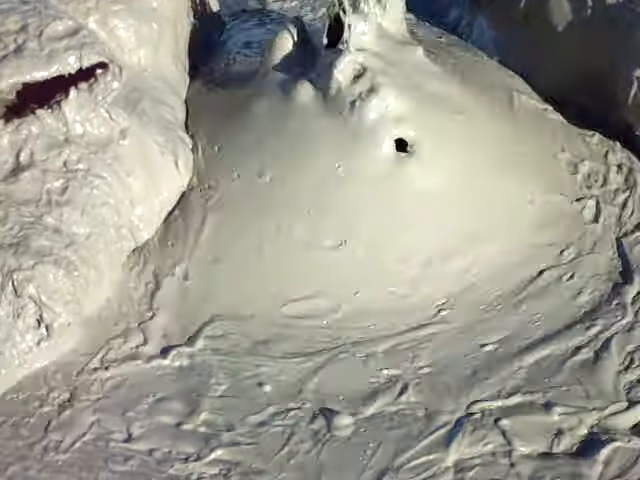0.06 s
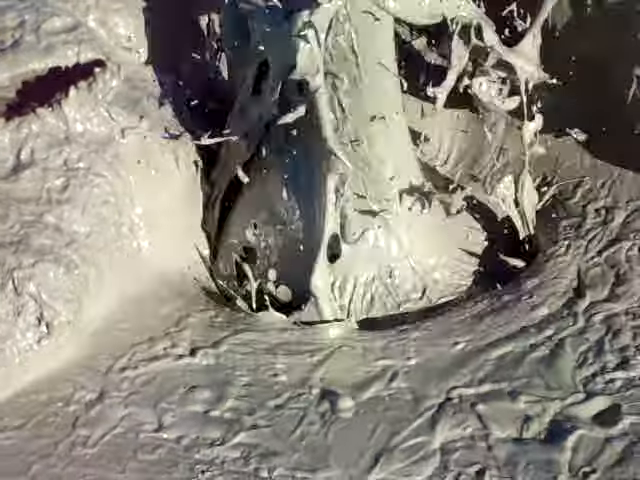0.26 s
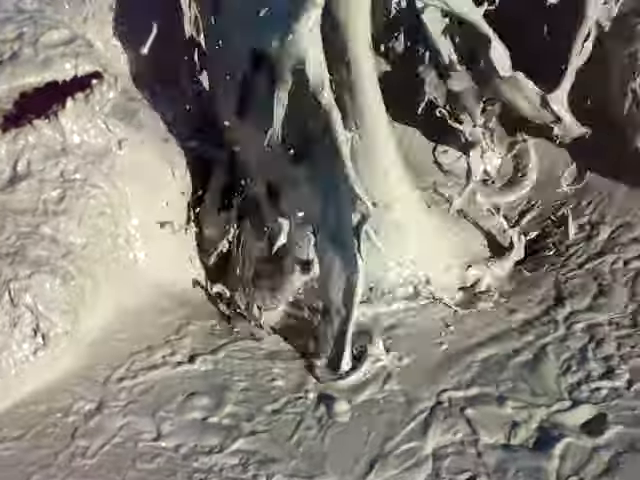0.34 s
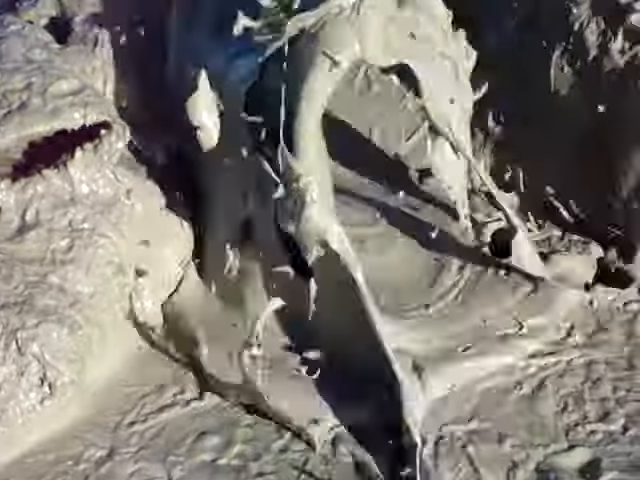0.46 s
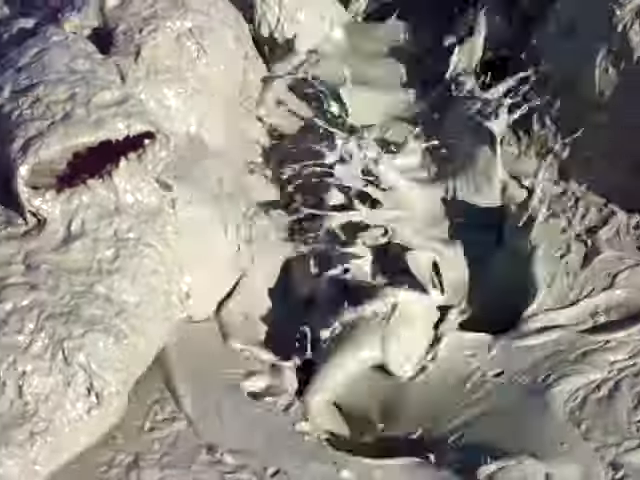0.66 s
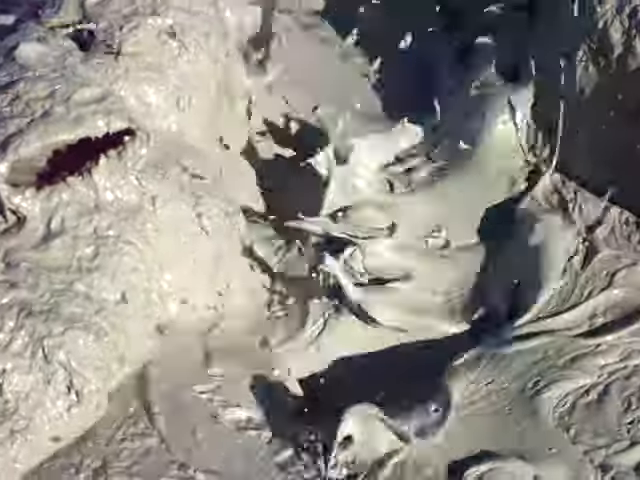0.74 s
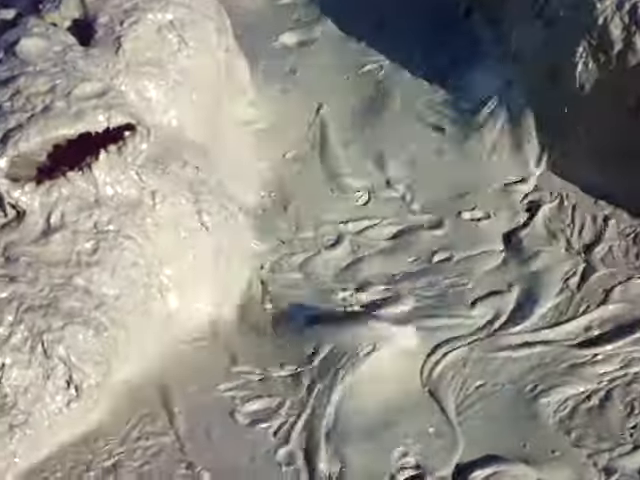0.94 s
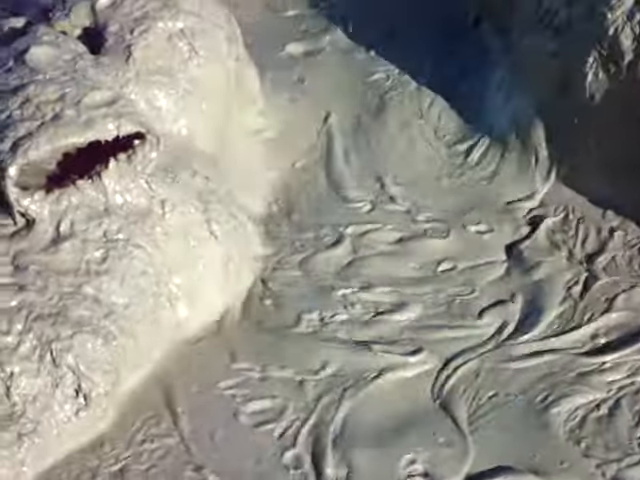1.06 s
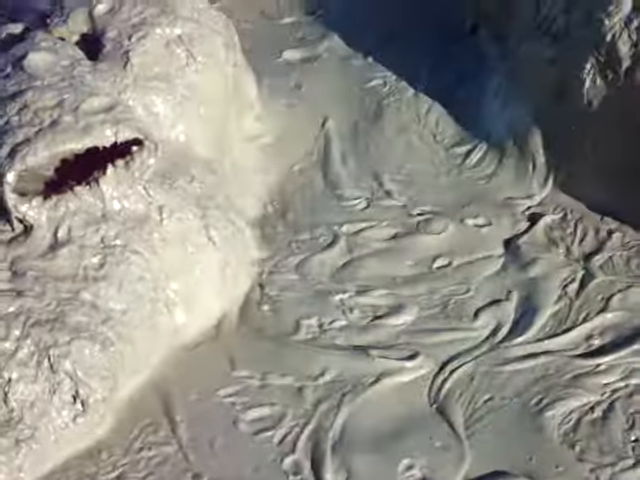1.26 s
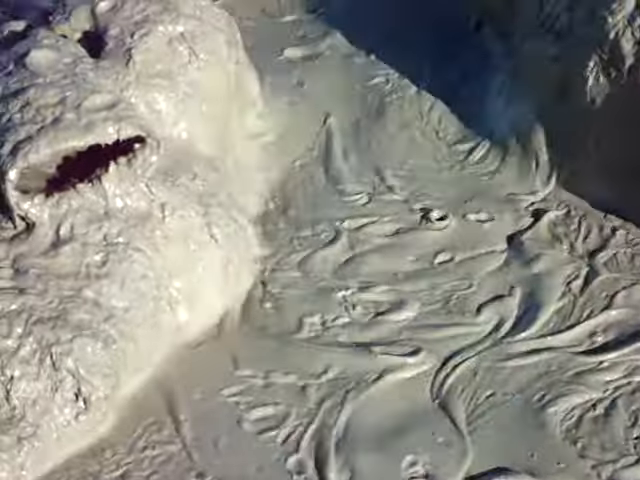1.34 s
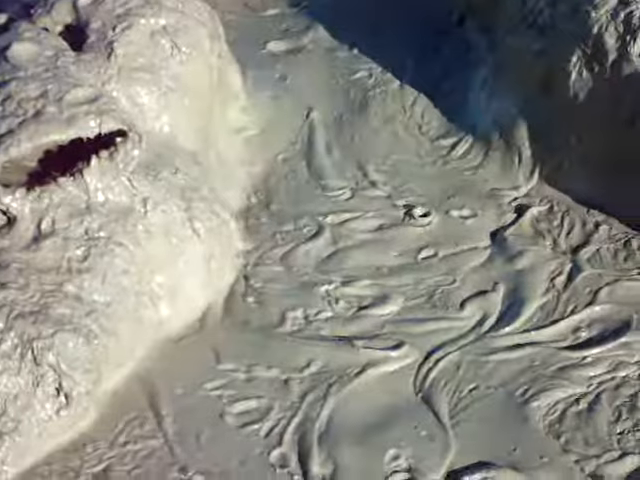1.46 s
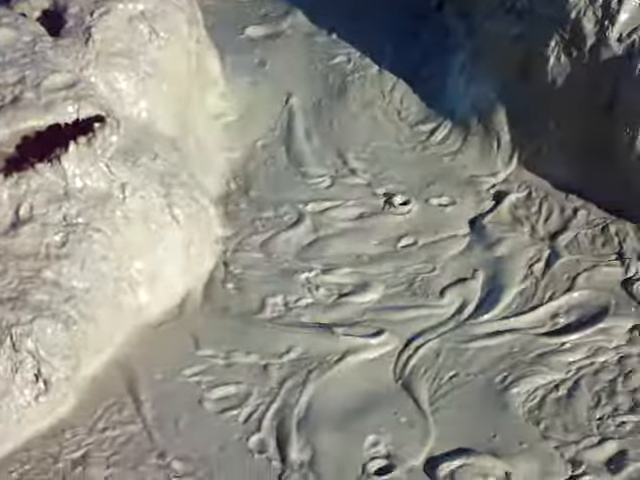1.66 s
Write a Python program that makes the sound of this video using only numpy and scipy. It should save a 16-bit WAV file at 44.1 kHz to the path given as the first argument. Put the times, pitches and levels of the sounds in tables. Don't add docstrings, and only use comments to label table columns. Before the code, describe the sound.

Thick mud bubble pops open with a hollow gulp, then blobs splatter and slap back down

```python
import sys
import numpy as np
from scipy import signal
from scipy.fft import rfft, irfft
from scipy.io import wavfile
from scipy.ndimage import uniform_filter1d, minimum_filter1d

SR = 44100
rng = np.random.default_rng(int(sys.argv[2]) if len(sys.argv) > 2 else 0)


def gain_from_db(level_db):
    decades = np.asarray(level_db, float) / 20
    return 10 ** decades


def master_out(mix):
    frames = np.transpose(np.atleast_2d(mix))
    ceiling = np.clip(frames, -1, 1)
    pcm = np.round(ceiling * 32767).astype(np.int16)
    wavfile.write(sys.argv[1], SR, pcm)


N = 74970


def evened(x):
    return x / np.sqrt(np.mean(x ** 2) + 1e-20)


def along(points, column=1):
    rows = np.array(points)
    return np.interp(np.arange(N) / SR, rows[:, 0], rows[:, column])


def during(points):
    t = np.arange(N) / SR
    return gain_from_db(along(points)) * (t > points[0][0]) * (t < points[-1][0])


def colour(x, points):
    hz = np.fft.rfftfreq(len(x), 1 / SR) + 1
    f, db = np.transpose(points)
    ends = 18 * np.log2(np.minimum(hz / f[0], 1)) - 18 * np.log2(np.maximum(hz / f[-1], 1))
    gain = gain_from_db(np.interp(np.log(hz), np.log(f), db) + ends)
    return evened(irfft(rfft(x) * gain, len(x)))


def add(mix, s, sound):
    part = mix[round(s * SR):][:len(sound)]
    part += sound[:len(part)]


def lumps(size):
    return evened(uniform_filter1d(uniform_filter1d(rng.standard_normal(N), size), size))


def gulp():
    # start_s, pitch_hz, level_db
    cavity = [
        (.202, 150, -34),
        (.212, 250, -13),
        (.219, 275, -4),
        (.23, 232, -11.5),
        (.238, 195, -17),
        (.244, 330, -9),
        (.2495, 320, -18),
        (.256, 365, -7),
        (.268, 385, -16),
    ]
    crest_s, crest_lean_rad = .2212, 0.69
    crater_hz, crater_width_hz, crater_db = 790, 120, 9
    overtone_db, overtone_slope_db, close_s = -17, -2.2, .003
    steepen = 0.59
    t = np.arange(N) / SR
    hz, level_db = along(cavity), along(cavity, column=2)
    phase = 2 * np.pi * np.cumsum(hz * (1 + 0.063 * lumps(size=80))) / SR
    phase = phase - phase[round(crest_s * SR)]
    wave = gain_from_db(1.93 * lumps(size=60)) * np.cos(phase)
    for k in range(2, 7):
        ring_db = crater_db / (1 + ((k * hz - crater_hz) / crater_width_hz) ** 2)
        partial_db = overtone_db + overtone_slope_db * k + ring_db
        partial_db = partial_db + steepen * (level_db + 13) + 1.2 * lumps(size=100)
        wave = wave + gain_from_db(partial_db) * np.cos(k * phase + (k - 1) * crest_lean_rad)
    inside_s = np.minimum(t - cavity[0][0], cavity[-1][0] - t)
    return gain_from_db(level_db) * wave * np.clip(inside_s / close_s + 1, 0, 1)


def grains(per_s, spread_db, points):
    size = gain_from_db(spread_db * np.minimum(rng.exponential(1, N), 3.5)) * (rng.random(N) < per_s / SR)
    kind = rng.integers(0, 30, N)
    t, out = np.arange(500) / SR, np.zeros(N)
    for k, hz in enumerate(np.linspace(18, 100, 30) ** 2):
        life_s = 0.77 / hz + 0.00043
        splat = t / life_s * np.exp(-t / life_s) * np.sin(2 * np.pi * hz * t * (1 + 15 * t))
        out += signal.oaconvolve(size * (kind == k), splat)[:N]
    level = rfft(out)
    flat = level / np.sqrt(uniform_filter1d(abs(level) ** 2, size=1500) + 1e-9)
    return colour(irfft(flat, N), points)


def splatter():
    # start_s, level_db
    tear_curve = [(.1, -82), (.12, -42), (.16, -37.5), (.21, -33.5), (.222, -21.5), (.24, -30.5),
                  (.27, -31.5), (.285, -38.5), (.3, -42)]
    first_slap_curve = [(.685, -57), (.696, -28.5), (.702, -25.5), (.708, -37), (.713, -26), (.721, -39),
                        (.728, -82)]
    slap_curve = [(.728, -41.5), (.741, -16.5), (.755, -23), (.765, -20), (.772, -24), (.782, -23),
                  (.791, -30.5), (.799, -22.5), (.812, -52)]
    drizzle_curve = [(.27, -66), (.3, -41.5), (.45, -52.5), (.55, -43), (.68, -48), (.82, -45),
                     (.95, -51.5), (1.3, -58)]
    # freq_hz, density_db_per_hz
    tear_colour = [(300, -4.5), (900, -2.5), (2000, -6), (3500, -10.5), (10000, -20.5)]
    slap_colour = [(220, -2), (450, -11), (900, 3), (1150, -8.5), (1650, 3), (2200, -3), (3500, -1.5),
                   (10000, -14.5)]
    dull_hz, open_s, brighten_s = 4780, 0.162, 0.0098
    tear = grains(16000, 2.5, tear_colour)
    sheet = grains(9000, 3, slap_colour)
    drizzle = grains(3000, 3.2, slap_colour)
    shut = np.clip((open_s - np.arange(N) / SR) / brighten_s, 0, 1)
    dull = signal.filtfilt(*signal.butter(4, dull_hz, fs=SR), tear)
    out = during(tear_curve) * (tear + shut * (dull - tear))
    out += (during(first_slap_curve) + during(slap_curve)) * sheet
    return out + during(drizzle_curve) * drizzle


def plop(hz):
    cycles, rise, attack_s, softness = 0.68, 0.018, 0.00042, 0.71
    t = np.arange(1200) / SR
    life_s = cycles / hz + attack_s
    swell = (t / life_s) ** softness * np.exp(-t / life_s)
    ring = np.sin(2 * np.pi * hz * t * (1 + rise * np.minimum(t * hz / 6, 1)))
    return swell / swell.max() * ring


def blobs():
    # start_s, plop_peak_db, plop_pitch_hz,
    # spray_re_plop_db
    falling_blobs = [(.121, -30.5, 706, -17), (0.237, -11, 2580, -12), (0.27, -13.5, 1360, -14),
                     (.296, -10, 1510, -59), (.3212, -11.5, 1780, -3), (0.326, -9.5, 497, -35),
                     (0.3258, -10.5, 800, -23), (.333, -15.5, 411, -10.5), (.369, -30.5, 1570, 1),
                     (0.38, -24, 4060, -21), (.389, -12, 860, -22), (0.4125, -8, 1730, -13),
                     (0.416, -8, 898, -16.5), (.44, -18, 1540, -40), (0.457, -23.5, 4240, 2.5),
                     (0.483, -26, 3920, -5.5), (0.503, -22, 3920, -16), (0.517, -26, 2900, -13),
                     (0.553, -9, 3990, -16), (0.573, -21.5, 1310, -2), (.604, -20, 860, -12),
                     (.642, -24.5, 910, -6),
                     (.675, -39, 4500, 3), (.701, -16, 1180, -6), (.702, -17, 500, -25),
                  (.712, -17, 1750, -10), (.7175, -18, 400, -9), (.742, -5, 800, -9), (.745, -10, 1620, -9),
                  (.764, -12, 1700, -4), (.7762, -12, 1600, -6), (.795, -16, 1850, -2),
                  (.838, -35, 4340, 0), (.856, -21, 1100, -8), (.871, -15, 4380, -8),
                  (.8855, -18, 1150, -20), (.8922, -10.5, 1050, -22), (.9302, -21, 1650, -12),
                  (.9435, -22, 1050, -8), (1.015, -41, 3000, 2), (1.098, -47, 2600, 2),
                  (1.196, -42, 3000, 2)]
    # start_s, peak_db, pitch_hz
    clumps = [(.156, -31, 850), (0.183, -23, 3190), (0.2281, -16, 1570), (0.2363, -21, 1800),
              (.2575, -29, 1900), (.274, -17.5, 1600), (0.278, -25, 900), (.296, -19, 970),
              (0.3266, -16.5, 1760), (0.344, -31, 402), (.42, -29, 520), (0.423, -32, 1980),
              (.43, -36, 1980), (.477, -31, 3920), (0.4853, -32, 2730), (.499, -35, 3060),
              (.536, -36, 2700), (0.5432, -27, 3000), (0.549, -25, 2800), (0.5528, -24, 1530),
              (0.56, -25.5, 4360), (0.5637, -35, 5240), (.5755, -30, 2500), (.606, -27, 1160),
              (0.612, -30, 1610), (.633, -38, 4040), (.648, -28, 1760), (.666, -35, 1710),
              (.693, -24.5, 1670), (0.7013, -17.5, 1850), (0.7156, -19.5, 1730), (0.7207, -21, 2570),
              (.7305, -27, 820), (0.743, -14, 4310), (0.7422, -12.5, 2740), (0.7478, -20.5, 361),
              (.75, -20.5, 710), (0.763, -26, 3360), (.766, -21, 2440), (.769, -16.5, 1440),
              (0.7734, -15, 1410), (0.7787, -15.5, 3780), (.779, -16.5, 2670), (0.78, -14.5, 1690),
              (.758, -19, 417), (0.794, -16, 3010), (.7962, -16, 3700), (0.8028, -15.5, 1700),
              (0.805, -29, 1520), (0.85, -30, 1420), (0.8563, -23, 3600), (.8712, -21.5, 3120),
              (.876, -33, 4650), (0.8927, -27.5, 2980), (.9, -28.5, 920), (0.913, -32, 1820),
              (.926, -33.5, 1980), (0.976, -38, 3630), (0.975, -40, 1280), (1.027, -42, 2670)]
    # freq_hz, density_db_per_hz
    spray_colour = [(1500, 4), (2500, -3), (4500, 4), (10000, -5)]
    lead_s, late_s, rise_s, fall_s = .005, .0017, .0013, .0024
    plop_db, spray_trim_db, body_db = -4, -4, -14
    out, t = np.zeros(N), np.arange(1200) / SR
    spray = colour(rng.standard_normal(N), spray_colour)
    puff = np.exp(np.minimum((t - lead_s) / rise_s, (lead_s - t) / fall_s))
    for s, db, hz, spray_db in falling_blobs:
        band = signal.butter(3, [hz * .55, hz * 2.0], "band", fs=SR)
        smack = evened(signal.lfilter(*band, rng.standard_normal(len(t))))
        mist = gain_from_db(spray_db + spray_trim_db) * spray[round(s * SR):][:len(t)]
        add(out, s, gain_from_db(db + plop_db) * plop(hz))
        add(out, s - lead_s + late_s, gain_from_db(db) * puff * (gain_from_db(body_db) * smack + mist))
    for s, db, hz in clumps:
        add(out, s, gain_from_db(db) * plop(hz))
    return out


def wind():
    # start_s, level_db
    gust_curve = [(0, -45.5), (.06, -42.5), (.12, -52), (.33, -52), (.45, -56), (.51, -45.5), (.6, -48),
                  (.85, -47), (.93, -33.5), (.97, -37.5), (1.04, -37), (1.14, -40.5), (1.25, -47),
                  (1.32, -43.5), (1.43, -53.5), (1.49, -38.5), (1.6, -41.5), (1.7, -59)]
    # freq_hz, density_db_per_hz
    gust_colour = [(25, -30), (68, -12), (156, -2), (270, -6), (400, -13.5), (700, -42.5)]
    # start_s, peak_db, pitch_hz
    knocks = [(0.012, -34, 204), (0.655, -32, 180), (0.768, -21.5, 263), (0.912, -23, 198),
              (1.018, -33, 230), (1.029, -24, 170), (1.062, -26.5, 155), (1.158, -31, 182),
              (1.319, -26.5, 156), (1.498, -28, 277), (1.5438, -18.5, 260), (1.603, -28.5, 100)]
    lump_db = 2
    gain = gain_from_db(along(gust_curve) + lump_db * lumps(size=500))
    out = gain * colour(rng.standard_normal(N), gust_colour)
    t = np.arange(-600, 600) / SR
    for s, db, hz in knocks:
        knock = np.exp(-(t * hz / .42) ** 2) * np.cos(2 * np.pi * hz * t)
        add(out, s - 500 / SR, gain_from_db(db) * knock)
    return out


def bird():
    # start_s, length_s, start_hz, end_hz, level_db
    whistles = [(.9, .035, 4450, 4700, -53), (.935, .025, 4900, 5200, -50), (1.085, .08, 2060, 2050, -57),
                (1.105, .03, 3200, 2600, -54), (1.122, .027, 3200, 3480, -45),
                (1.148, .018, 3900, 4050, -55), (1.158, .022, 4350, 4480, -54),
                (1.2, .025, 2450, 2850, -55), (1.228, .037, 3250, 3600, -49), (1.272, .03, 3900, 4250, -50),
                (1.295, .02, 6400, 5550, -53), (1.315, .022, 5600, 6150, -56),
                (1.34, .028, 7150, 7450, -57), (1.37, .1, 2070, 2050, -53), (1.415, .025, 4180, 4200, -58),
                (1.455, .02, 3300, 2880, -56), (1.472, .06, 2790, 2780, -48)]
    out, waver = np.zeros(N), lumps(size=120)
    for s, length_s, from_hz, to_hz, db in whistles:
        u = np.arange(0, length_s, 1 / SR) / length_s
        hz = from_hz + (to_hz - from_hz) * (u + .12 * waver[round(s * SR):][:len(u)])
        tone = np.sin(2 * np.pi * np.cumsum(hz) / SR)
        add(out, s, gain_from_db(db) * np.sin(np.pi * u) ** .5 * tone)
    return out * gain_from_db(3.4 * lumps(size=200))


def air():
    # freq_hz, density_db_per_hz
    air_colour = [(200, -8), (500, -8), (1200, -16.5), (2600, -20.5), (5700, -27.5), (10000, -32)]
    level_db = -48
    return gain_from_db(level_db + 0.51 * lumps(size=900)) * colour(rng.standard_normal(N), air_colour)


def masked(x):
    # freq_hz, level_re_loud_db
    mask = [(2000, -56), (3500, -33), (6000, -26), (10000, -29)]
    fall_db_per_s, chance_db, band_bins = 639, 6.5, 5
    hz, t, z = signal.stft(x, SR, nperseg=256)
    power = abs(z) ** 2
    loud_db = 10 * np.log10(power[5:].sum(0) + .03 * power[1:5].sum(0) + 1e-12)
    fall_db = t * fall_db_per_s
    held_db = -minimum_filter1d(-loud_db, size=5)
    loud_db = np.maximum.accumulate(held_db + fall_db) - fall_db
    band = np.arange(len(hz)) // band_bins
    band_power = np.add.reduceat(power, np.arange(0, len(hz), band_bins))
    band_db = 10 * np.log10(band_power[band] + 1e-12)
    draws = rng.standard_normal((len(t) // 2 + 1, band[-1] + 1))
    chance = np.repeat(draws, 2, 0)[:len(t)].T[band]
    f, db = np.transpose(mask)
    floor_db = np.interp(np.log(hz + 1), np.log(f), db, left=-200)[:, None]
    over_db = band_db - loud_db - floor_db + chance_db * chance
    passed = z / (1 + np.exp(-np.clip(over_db, -9, 9)))
    return signal.istft(passed, SR, nperseg=256)[1][:N]


def scene():
    return (gulp() + splatter() + blobs() + wind() + bird() + air())[None]


def band_limit(x):
    return signal.sosfilt(signal.butter(12, 10770, fs=SR, output="sos"), x)


def record(dry):
    thin = signal.lfilter(*signal.butter(2, 40, "high", fs=SR), dry[0])
    held = np.clip(thin, -.7, .7)
    edge = signal.firwin(401, 10150, window=("kaiser", 7), fs=SR)
    mix = signal.oaconvolve(masked(held)[None], edge[None], "same")
    return band_limit(mix)


dry = scene()
out = record(dry)
master_out(out)
```